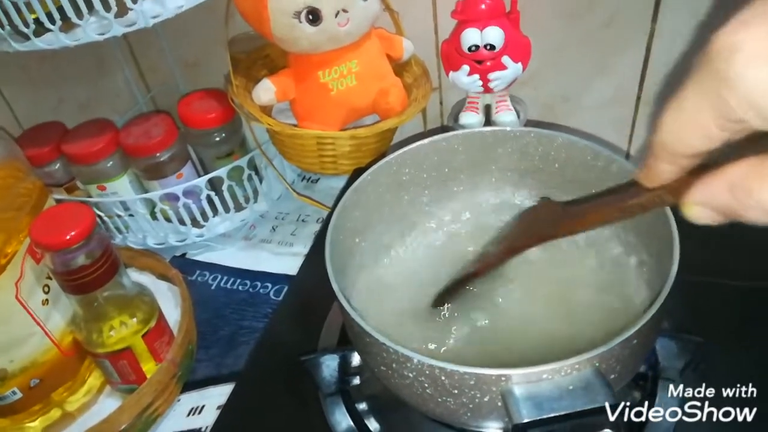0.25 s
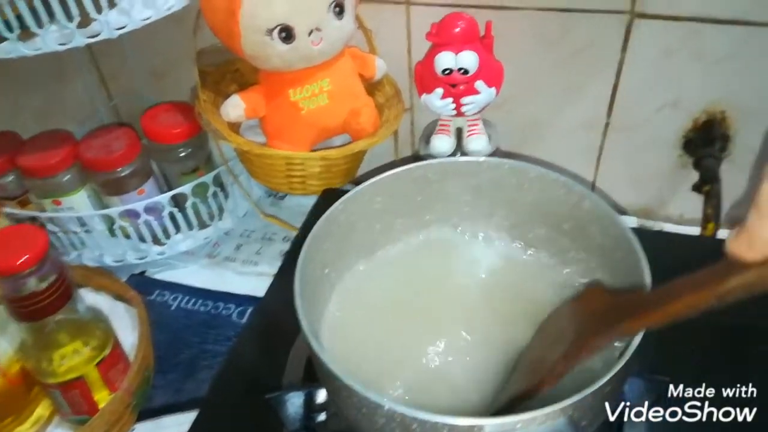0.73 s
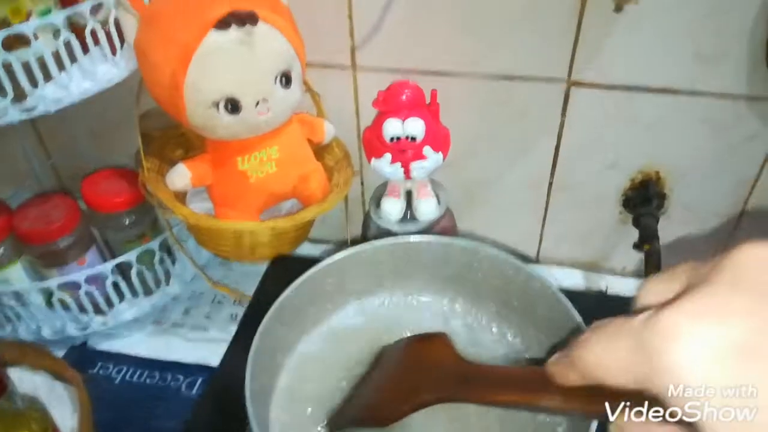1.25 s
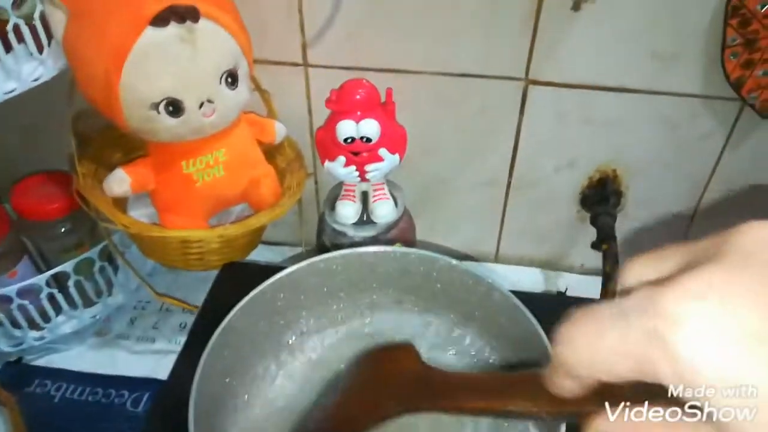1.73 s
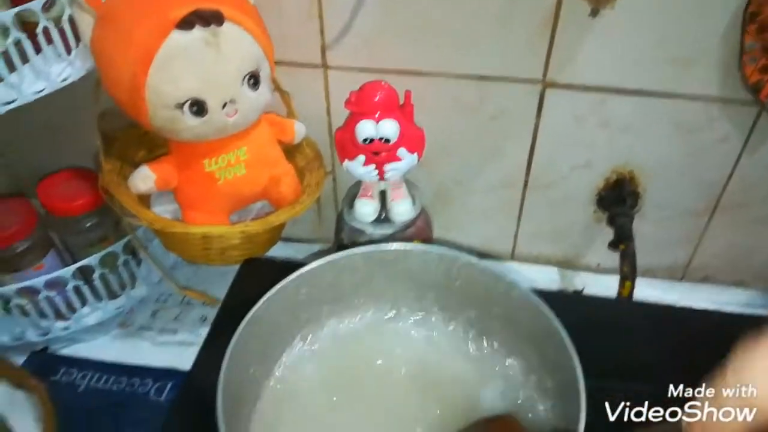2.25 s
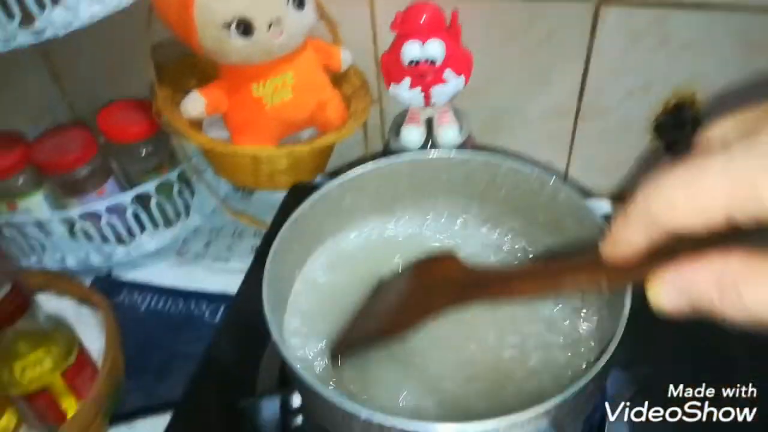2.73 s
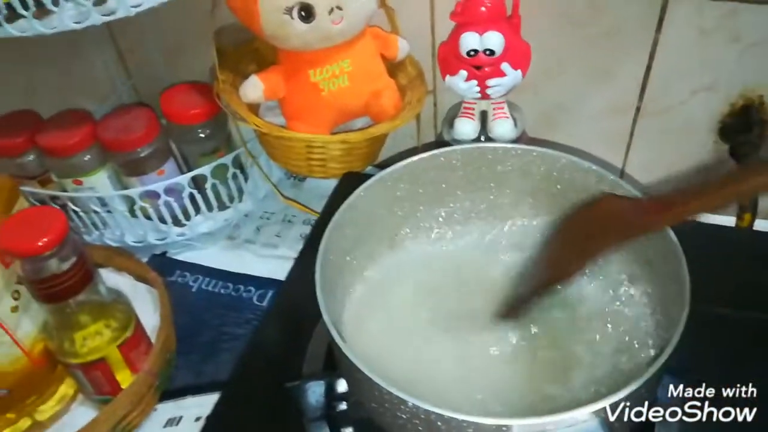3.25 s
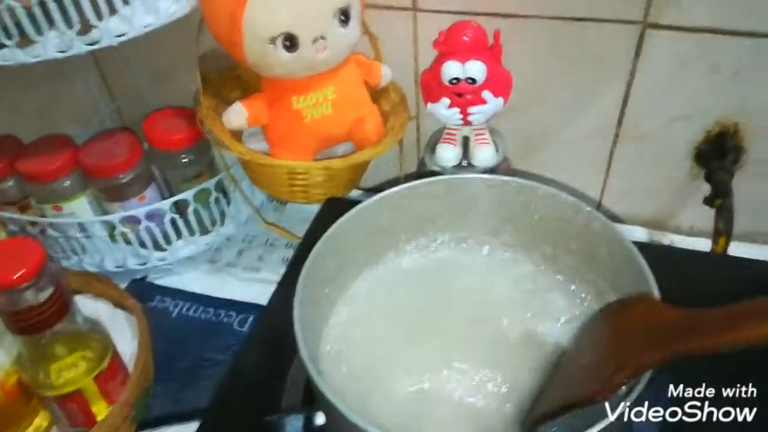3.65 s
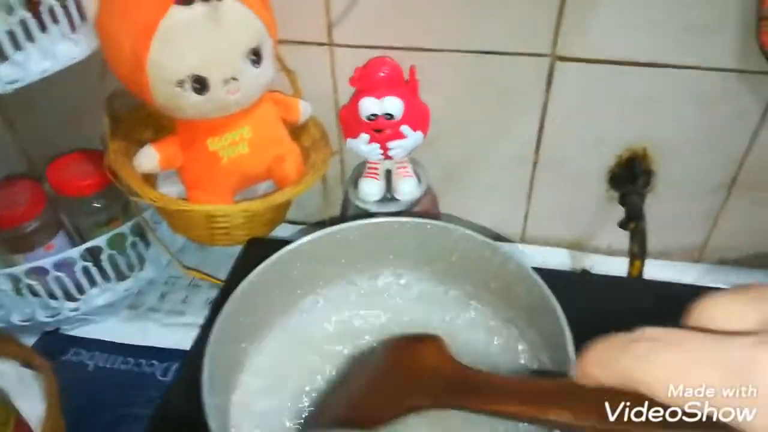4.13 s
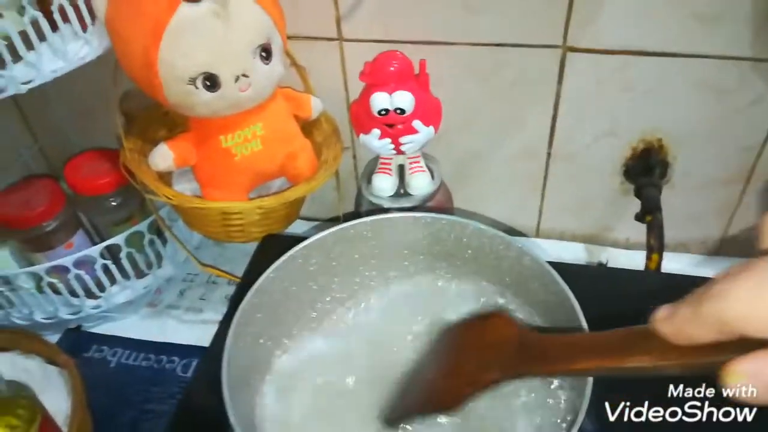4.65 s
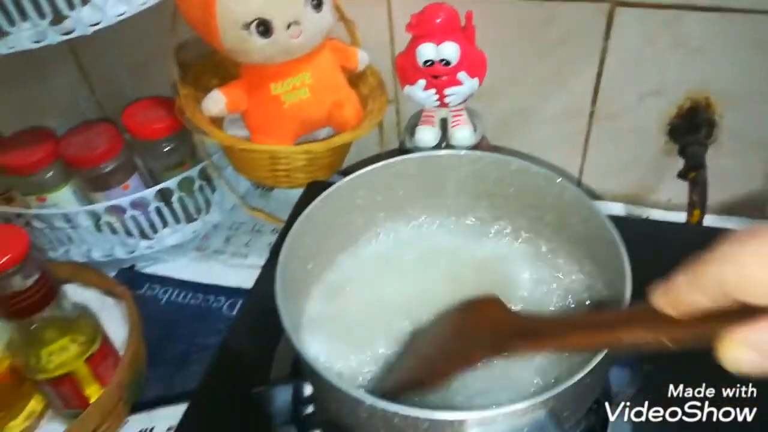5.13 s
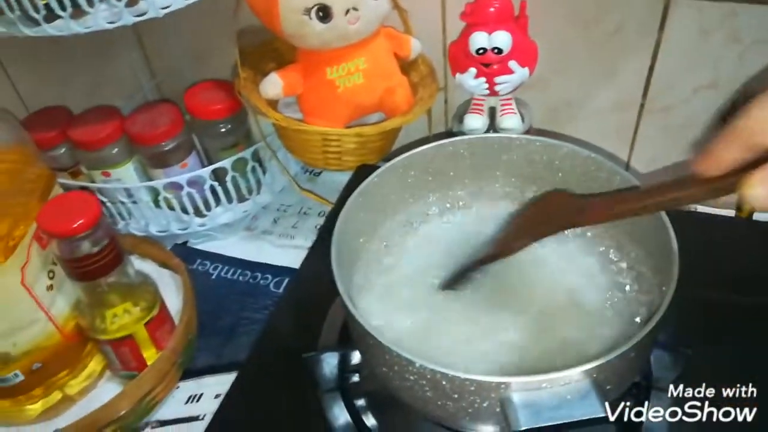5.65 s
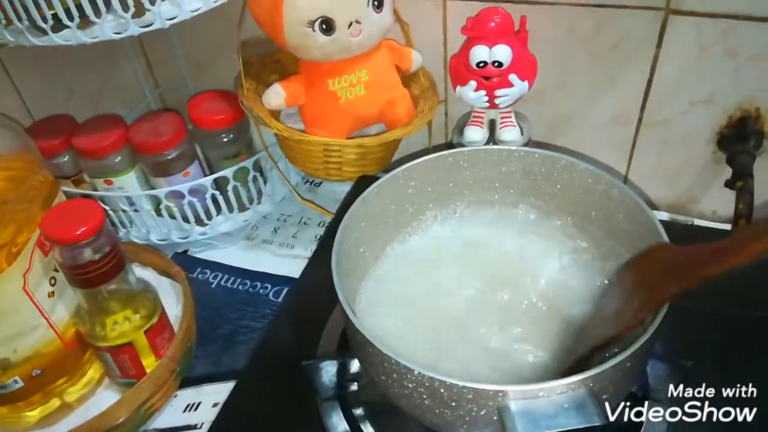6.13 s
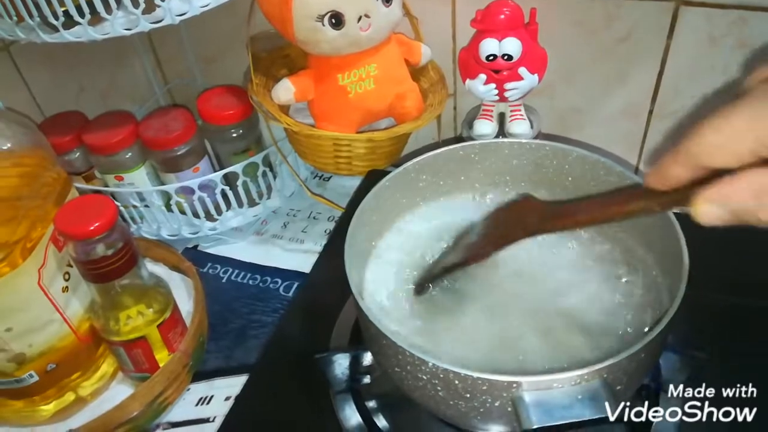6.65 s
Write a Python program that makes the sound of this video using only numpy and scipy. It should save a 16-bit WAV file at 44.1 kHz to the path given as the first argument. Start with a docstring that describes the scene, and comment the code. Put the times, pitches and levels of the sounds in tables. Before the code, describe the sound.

Sugar syrup simmers throughout in a saucepan: a dense, soft, fizzing hiss of countless tiny bursting bubbles, with a slightly hollow ring from the pan and a very faint low burner drone. The hiss flickers and swells briefly with the stirring, notably near 3.5 and 6.1 seconds, while the larger bubbling slowly eases. A wooden spoon makes short, wet, gliding swishes, with scrapes around 1.9, 3.05 and 6.1 seconds. Handling of the phone adds low thumps from 1.7 seconds, the strongest between 2.55 and 3.1, deep and booming, with dull finger rubs and a rough scuff at 2.8. After that it calms. Soft, damped wood-on-pan knocks come at about 3.1, 4.8, 5.2, 5.5 and 6.4 seconds. The hand-held phone is close, in stereo, with short dull echoes from the tiled kitchen.

```python
"""A simmering hiss runs throughout: sugar syrup bubbles in a saucepan on a gas ring, heard from a hand-held phone.
Dense random clicks, coloured by filters, make the bursting bubbles; resonances ring as the hollow of the pan.
A wooden spoon swishes, scrapes and softly knocks: noise bands at gliding pitches, and damped pan modes.
The shifting grip thumps (decaying low sines), a finger rubs the phone's case (filtered clicks, case modes),
and the hand rumbles (deep noise), over a low kitchen drone of resonant noise."""
import sys
import numpy as np
from scipy import signal
from scipy.fft import rfft, irfft
from scipy.io import wavfile
from scipy.ndimage import map_coordinates

SR = 44100
rng = np.random.default_rng(int(sys.argv[2]) if len(sys.argv) > 2 else 0)


def wav_record(signal):
    """Record a signal, one row per channel, as 16-bit PCM in the file named by sys.argv[1]."""
    frames = np.transpose(np.atleast_2d(signal))
    bounded = np.clip(frames, -1, 1)
    # unit amplitude maps onto the largest positive 16-bit level
    quanta = np.round(bounded * 32767).astype(np.int16)
    wavfile.write(sys.argv[1], SR, quanta)


N = 304113
T = np.arange(N) / SR
FREQ = np.maximum(np.arange(N // 2 + 1) * SR / N, 1e-3)  # Hz, kept above zero for the logarithm

# modes of the phone's case, lowest first: pitch_hz, relative_level_db, t60_s
CASE_MODES = [(131.7, -4, 0.6), (159, -12.5, 0.9), (238.6, 0.5, 0.27), (330.6, -7, 0.3), (371, -7, 0.23),
              (387, -15, 0.23), (486, -15, 0.2), (527, -2.5, 0.21), (610, -8, 0.28), (697, -5, 0.24),
              (790, -14, 0.2), (867, -10, 0.28), (1070, -9, 0.24)]


def undb(db):
    """Decibels to gain."""
    return 10 ** (np.asarray(db) / 20)


def unit(x):
    """Scale to rms 1."""
    return x / np.sqrt(np.mean(x ** 2))


def shape(x, gain):
    """Filter by a gain for each frequency."""
    return irfft(rfft(x) * gain, N)


def colour(hz, db):
    """Gain of a spectrum given by points, interpolated in log frequency."""
    return undb(np.interp(np.log(FREQ), np.log(hz), db))


def resonance(hz, width_hz):
    """Gain of a resonance, applied twice for steep skirts."""
    return 1 / (1 + ((FREQ ** 2 - hz ** 2) / (FREQ * width_hz * np.pi / 2)) ** 2)


def lowpass(hz, order=4):
    """Gain of a smooth low-pass."""
    return 1 / np.sqrt(1 + (FREQ / hz) ** (2 * order))


def ring_out(t, t60_s):
    """Exponential decay by 60 dB in t60_s."""
    return np.exp(-np.log(1000) * t / t60_s)


def walk(rate):
    """Slow random curve of rms 1: pi * rate knots per second, joined by lines."""
    knots = rng.standard_normal(N // 100)
    return unit(np.interp(np.pi * rate * T, np.arange(len(knots)), knots))


def bursts(rate, spread_db):
    """Dense tiny clicks at each port, rate per second, many weak and a few strong; rms 1."""
    size = undb(spread_db * np.minimum(rng.exponential(size=(2, N)), 5))
    sign = rng.choice([-1, 1], (2, N))
    return unit((rng.random((2, N)) < rate / SR) * size * sign)


def swell(s, half):
    """A smooth rise and fall that peaks at 1."""
    return np.exp(-((T - s) / half) ** 2 / 2)


def blow(s, attack_s, decay_s):
    """A quick rise from s on, multiplied by an exponential fall."""
    t = np.maximum(T - s, 0)
    return np.minimum(t / attack_s, 1) * np.exp(-t / decay_s)


def wash(crush, envelope, hz, width_hz, pan_db):
    """Crushed froth heard through a gap that rings at a moving pitch."""
    out = np.zeros((2, N))
    near = envelope > envelope.max() / 1000
    sos = signal.butter(3, width_hz / 2, fs=SR, output="sos")
    band = signal.sosfilt(sos, crush[:, near])
    carrier = np.exp(2j * np.pi * np.cumsum(hz[near]) / SR)  # moves the band up to the pitch
    out[:, near] = unit((band * carrier).real) * envelope[near] * undb([[pan_db / 2], [-pan_db / 2]])
    return out


def simmer(split_hz=6500, flicker_db=1.28, diffuse=0.15, finest_hz=11500, finest_share=1.0,
           ring_flicker_db=0.95):
    """Bursting bubbles hiss, fine froth fizzes above them, and the air in the pan rings along."""
    # colour of the simmer at the two microphone ports: pitch_hz, left_db, right_db
    sizzle = [(201, -1, -38), (260, -19, 0), (476, -15, -22.5), (645, -10, -1), (1106, 4, -3.5),
              (1470, -12, -12), (1780, 3, 1.5), (1840, 1.5, -25), (2150, 2.5, 0.5), (3300, 2.5, 2.5),
              (4340, 0, -3), (7130, -10, -7), (7560, -12, -4), (8500, -14.5, -7), (10900, -18, -7),
              (16300, -27.5, -13)]
    # air resonances of the pan: pitch_hz, width_hz, left_db, right_db
    hollow_modes = [(1203, 240, -3, -2), (1558, 110, 5, -6.5), (1755, 153, 3, -2)]
    # syrup washes up the hot wall and flares into froth: peak_s, half_length_s, froth_rise_db
    flares = [(0.27, 0.033, 2.5), (0.518, 0.033, 2.5), (0.724, 0.22, 1.5), (1.642, 0.038, 2.5),
              (2.05, 0.048, 2.5), (2.478, 0.057, 2.5), (3.106, 0.076, 1), (3.46, 0.12, 4.5),
              (3.917, 0.017, 3), (4.556, 0.066, 2.5), (4.88, 0.082, 3), (5.237, 0.045, 2),
              (5.67, 0.12, 1.5), (6.11, 0.23, 3)]
    bubbling_db, froth_db, hollow_db = -56.5, -56.5, -63  # at rest
    calm_db_per_s, flare_bubbling_share = 0.4149, 0.52  # larger bubbles follow part of a flare's rise
    turn_s, turn_peak_s, turn_froth_db, turn_hollow_db = 3.02, 3.17, 0.8, 0.5  # slow turns of the stirring
    hollow_drift_share = 0.022

    turn = np.cos(2 * np.pi * (T - turn_peak_s) / turn_s)
    flare = sum(db * swell(s, half) for s, half, db in flares)
    bubbling = bubbling_db - calm_db_per_s * T + flare_bubbling_share * flare
    froth = froth_db + turn_froth_db * turn + flare
    hollow = hollow_db + turn_hollow_db * turn

    hz, *ports = np.transpose(sizzle)
    tint = np.array([colour(hz, db) for db in ports]) * (1 - lowpass(294))
    coarse = lowpass(split_hz)
    big = unit(shape(bursts(rate=9000, spread_db=0.5), tint * coarse))
    big = big * undb(bubbling + flicker_db * walk(11))

    fizz = unit(tint * np.sqrt(1 - coarse ** 2))
    fine = shape(bursts(rate=14000, spread_db=2.0), fizz * lowpass(finest_hz))
    fine = fine * undb(flicker_db * walk(14))
    mist = bursts(rate=20000, spread_db=2.0)
    finest = shape(mist, fizz * np.sqrt(1 - lowpass(finest_hz) ** 2))
    # the finest fizz swells most when the froth rises up the hot wall
    finest = finest * undb(finest_share * (froth - froth.mean()) + flicker_db * walk(22))

    # the hollow is one source, heard by both ports, with some diffuse sound on top
    drive = bursts(rate=5500, spread_db=2.0)[0] + diffuse * bursts(rate=4100, spread_db=6.0)
    modes = sum(undb([[left], [right]]) * resonance(f, width) for f, width, left, right in hollow_modes)
    ring = unit(shape(drive, modes))
    # its pitch drifts as the spoon and the syrup move
    place = np.cumsum(1 + hollow_drift_share * walk(5))
    ring = np.array([map_coordinates(port, [place], order=1, mode="mirror") for port in ring])
    ring = ring * undb(hollow + ring_flicker_db * walk(11))
    return big + (fine + finest) * undb(froth) + ring


def spoon(shared=0.085, gurgle_db=1.8, gurgle_per_s=24, waver_octaves=0.018):
    """Strokes crush froth in small gurgles, the gap behind the spoon bends their pitch; scrapes bite and fade."""
    # swishes through the syrup:
    # peak_s, half_length_s, pitch_hz, glide_octaves_per_s, width_hz, level_db, left_minus_right_db
    strokes = [(0.097, 0.057, 2480, 0.17, 380, -60.5, 7), (0.19, 0.12, 1486, -0.5, 159, -62.5, 2),
               (0.245, 0.073, 3210, -0.19, 160, -63, -11), (0.468, 0.06, 1570, 0.073, 140, -61, 3),
               (0.65, 0.12, 3160, 0, 105, -64, -4), (1.02, 0.068, 2550, 0, 282, -61, -13),
               (1.161, 0.08, 2416, -0.58, 136, -61, -1), (1.805, 0.71, 2440, 0, 243, -64.5, 1),
               (2.127, 0.035, 1120, 0, 320, -64, 14), (2.341, 0.05, 1610, 0, 200, -59.5, 6),
               (2.38, 0.006, 1680, 0.14, 220, -53, 2), (3.093, 0.022, 1683, -0.012, 340, -50, 9),
               (3.143, 0.03, 1586, -1.3, 360, -55, 4), (3.213, 0.2, 4040, -0.023, 495, -69.5, -16),
               (3.329, 0.14, 2060, -0.094, 520, -63, 12), (3.333, 0.1, 1722, 0.2, 250, -54, 3),
               (3.42, 0.1, 8200, 0, 700, -68, -21), (3.908, 0.0244, 2705, 0.16, 160, -60.5, -23),
               (3.901, 0.093, 2940, 0, 605, -63.5, -9), (4.024, 0.04, 1680, -0.35, 200, -67, 4),
               (4.385, 0.074, 2960, 0.31, 220, -65.5, -2), (4.77, 0.073, 2626, -0.2, 200, -66, -9),
               (4.847, 0.045, 1970, 0.74, 200, -63.5, 7), (5.113, 0.07, 2970, 0.098, 348, -64, -3),
               (5.871, 0.12, 1910, 0.3, 454, -64, 7.5), (5.943, 0.025, 1580, -0.36, 300, -61.5, 11),
               (6.26, 0.025, 1700, -0.6, 150, -63, 3), (6.701, 0.3, 7700, 0, 560, -69, -8)]
    # the spoon's edge catches the wall and scrapes on:
    # start_s, attack_s, decay_s, pitch_hz, level_db, left_minus_right_db, width_hz
    catches = [(1.576, 0.038, 0.051, 436, -62, 2, 109), (1.918, 0.011, 0.04, 2700, -52, 2, 3800),
               (1.921, 0.018, 0.064, 1055, -56, 1, 840), (2.055, 0.015, 0.026, 964, -64, 2, 500),
               (3.049, 0.026, 0.034, 2990, -50.5, -5, 3800), (3.061, 0.023, 0.023, 1004, -53, 3, 284),
               (3.19, 0.063, 0.056, 267.3, -61, -2, 80), (4.315, 0.004, 0.006, 1310, -59.5, -9, 900),
               (4.812, 0.022, 0.046, 1096, -60, -6, 1600), (5.2, 0.088, 0.044, 321.4, -65, -1, 90),
               (5.64, 0.015, 0.021, 1600, -60, 8, 600), (6.124, 0.0046, 0.014, 1180, -51.5, -2, 1500),
               (6.141, 0.0044, 0.019, 1156, -51, -4, 1200), (6.125, 0.004, 0.058, 900, -59.5, -15, 300)]
    crush = bursts(rate=1700, spread_db=1.0) * np.exp(2j * np.pi * rng.random(N))
    crush = crush + shared * crush[::-1]  # each port hears a little of the other's bubbles
    bend = 2 ** (waver_octaves * walk(8))
    gurgle = crush * undb(gurgle_db * walk(gurgle_per_s))
    out = np.zeros((2, N))
    for s, half, hz, glide, width, db, pan_db in strokes:
        pitch = hz * bend * 2 ** (glide * (T - s))
        out += wash(gurgle, undb(db) * swell(s, half), pitch, width, pan_db)
    for s, attack, decay, hz, db, pan_db, width in catches:
        bite = blow(s, attack, decay) * np.exp(attack / decay)  # 1 at the end of the attack
        out += wash(crush, undb(db) * bite, hz * bend, width, pan_db)
    return out


def knocks(contact_s=0.01):
    """Wood drags briefly on the pan floor and rings its damped modes."""
    # soft knocks of the spoon on the pan: start_s, level_db
    contacts = [(1.601, -66), (3.141, -59), (3.223, -64), (3.268, -63), (4.818, -58), (5.185, -56),
                (5.278, -56), (5.478, -53.5), (6.439, -59)]
    # ring of the pan full of syrup: pitch_hz, relative_level_db, t60_s
    pan_modes = [(251, -5, 0.3), (323, 10, 0.11), (383, 4.5, 0.076), (526, 5.5, 0.047), (700, -1, 0.13)]
    push = sum(undb(db) * (T >= s) * np.exp(-np.abs(T - s) / contact_s) for s, db in contacts)
    t = T[:SR // 4]
    ring = sum(undb(db) * np.sin(2 * np.pi * hz * t) * ring_out(t, t60) for hz, db, t60 in pan_modes)
    drag = push * rng.standard_normal(N)
    return signal.fftconvolve(drag, ring / np.linalg.norm(ring))[:N]


def thumps(tail_db=-9, case_db=-27, tight_share=0.068, relax_s=0.072, t60_s=1):
    """Grip shifts swell the phone's low resonance, which sags as the hand relaxes; the lowest case mode joins."""
    # shifts of the grip: start_s, peak_db, settled_pitch_hz, swell_s
    shifts = [(0.306, -46, 95.2, 0.02), (0.383, -50, 57, 0.038), (1.707, -37, 61.6, 0.031),
              (1.781, -47.5, 59.5, 0.075), (2.046, -33.5, 59.2, 0.09), (2.273, -49.5, 61.7, 0.17),
              (2.557, -26, 55.7, 0.063), (2.821, -24.5, 59.8, 0.013), (2.921, -28.5, 56, 0.02),
              (3.034, -32.5, 56.1, 0.033), (3.143, -38, 62.2, 0.018), (3.64, -50, 52, 0.041),
              (3.849, -60, 57, 0.057), (4.341, -56.5, 62, 0.096), (5.79, -62, 69.5, 0.025)]
    case_hz = CASE_MODES[0][0]
    out = np.zeros(N)
    for s, db, hz, rise in shifts:
        t = np.maximum(T - s, 0)
        push = (t / rise * np.exp(1 - t / rise)) ** 2
        tail = undb(tail_db) * np.minimum(t / rise, 1) * ring_out(np.maximum(t - rise, 0), t60_s)
        # the pitch starts sharp by tight_share and sags to hz
        cycles = hz * (t + tight_share * relax_s * (1 - np.exp(-t / relax_s)))
        ring = np.sin(2 * np.pi * cycles) + undb(case_db) * np.sin(2 * np.pi * case_hz * t)
        out -= undb(db) * np.maximum(push, tail) * ring
    return out


def rubs(apart=1.0, ring_db=-12, touch_db=-1.3, detune_share=0.007):
    """Finger jerks pluck the case at new spots; it rings while the skin slips, each with its own brightness."""
    # the finger catches on the case: start_s, level_db, attack_s, decay_s, brightness_hz
    jerks = [(1.712, -49, 0.021, 0.043, 130), (1.889, -45, 0.025, 0.061, 150), (2.13, -49, 0.03, 0.29, 135),
             (2.559, -40.5, 0.016, 0.047, 750), (2.58, -39.5, 0.017, 0.038, 330),
             (2.608, -39, 0.012, 0.02, 560), (2.828, -28, 0.011, 0.041, 1140),
             (2.874, -33.5, 0.0037, 0.021, 1200), (2.892, -32.5, 0.011, 0.025, 480),
             (2.9, -44, 0.0083, 0.04, 1900), (2.93, -35, 0.0082, 0.026, 338),
             (3.064, -47.5, 0.007, 0.14, 270)]
    # colour of skin slipping on the case: pitch_hz, relative_level_db
    skin_colour = [(45, 9.5), (95, 7.5), (135, -3.5), (195, -16), (245, 3), (290, -7.5), (450, -13),
                   (650, -11), (1130, -11), (1800, -9.5), (2700, -56)]
    mid, side = bursts(rate=2400, spread_db=2.5)
    side = shape(side, 1 - lowpass(153, order=2))
    slips = mid + apart * np.array([[1], [-1]]) * side
    skin = colour(*np.transpose(skin_colour))
    mode_hz, mode_db, t60 = np.transpose(CASE_MODES)[:, :, None]
    out = np.zeros((2, N))
    for s, db, attack, decay, hz in jerks:
        slip = unit(shape(slips, skin * lowpass(hz, order=6)))
        out += slip * undb(db) * blow(s, attack, decay)
        near = (T > s) & (T < s + .5)
        t = T[near] - s
        detune, touch, phase = rng.standard_normal((3, len(CASE_MODES), 1))
        size = undb(mode_db + touch_db * touch) / np.hypot(1, (mode_hz / hz) ** 2)
        cycles = mode_hz * (1 + detune_share * detune) * t + phase
        ring = size * np.sin(2 * np.pi * cycles) * ring_out(t, t60)
        out[:, near] += undb(db + ring_db) * np.minimum(t / attack, 1) * ring.sum(axis=0)
    return out


def sway(top_hz=38, settle_s=0.074, tremor_db=-74):
    """The hand rumbles in the deepest bass: a faint tremor, and lurches that build up and settle."""
    # lurches of the hand: peak_s, level_db, build_up_s
    lurches = [(0.42, -58, 0.084), (1.75, -38.5, 0.015), (2.09, -46, 0.033), (2.6, -51.5, 0.15),
               (2.869, -41, 0.03), (3.14, -35.5, 0.071), (3.5, -54.5, 0.092), (4.43, -47, 0.07)]
    deep = colour([5.4, 16, 19, 13], [-5.0, -0.5, -4.0, -4.0]) * lowpass(top_hz, order=5)
    rumble = unit(shape(rng.standard_normal(N), deep))
    level = undb(tremor_db)
    for s, db, build in lurches:
        settle = np.exp(-np.abs(T - s) / settle_s)
        level = level + undb(db) * np.where(T < s, swell(s, build), settle)
    return rumble * level


def drone(waver_db=2.5, waver_per_s=3.3):
    """The burner's low roar gathers in a few resonances of the kitchen, each wavering on its own."""
    # resonances of the kitchen: pitch_hz, width_hz, level_db, side_to_mid_ratio
    room_modes = [(55.7, 17, -71.5, 0.16), (101.4, 9.4, -67.5, 0.18), (121, 49, -80, 0.97),
                  (270.4, 23, -80.5, 0.071), (333, 38, -81, 0.41), (517, 345, -74, 1)]
    mid, side = rng.standard_normal((2, N))
    side = side * np.array([[1], [-1]])
    out = np.zeros((2, N))
    for hz, width, db, apart in room_modes:
        roar = unit(shape(mid + apart * side, resonance(hz, width)))
        out += undb(db + waver_db * walk(waver_per_s)) * roar
    return out


def tiles(x, echo_db=-5, fade_s=0.01, dull_hz=3500, shift_per_s=1.6, count=3):
    """Pan wall and tiles return dull early echoes, different at each port, shifting as the phone moves."""
    t = T[:SR // 20]
    echoes = rng.standard_normal((count, 2, len(t))) * np.exp(-t / fade_s) * (t > 1 / 1000)
    echoes = undb(echo_db) * echoes / np.linalg.norm(echoes, axis=-1, keepdims=True)
    blend = np.array([walk(shift_per_s) for _ in echoes])
    blend = blend / np.linalg.norm(blend, axis=0)
    wet = sum(share * signal.oaconvolve(x, spray, axes=1)[:, :N] for share, spray in zip(blend, echoes))
    return (x + shape(wet, lowpass(dull_hz, order=1))) / np.sqrt(1 + undb(echo_db) ** 2)


def scene():
    """Pan, spoon, hand and kitchen together; only the simmer and the knocks get echoes."""
    return tiles(simmer() + knocks()) + spoon() + thumps() + rubs() + sway() + drone()


def record(dry, top_hz=15600):
    """The phone cuts the top with a steep elliptic low-pass."""
    return signal.sosfilt(signal.ellip(12, .1, 90, top_hz, fs=SR, output="sos"), dry)


dry = scene()
out = record(dry)
wav_record(out)
```